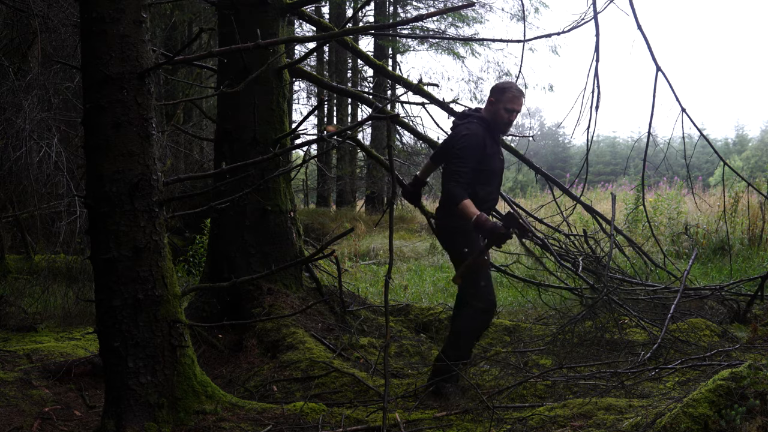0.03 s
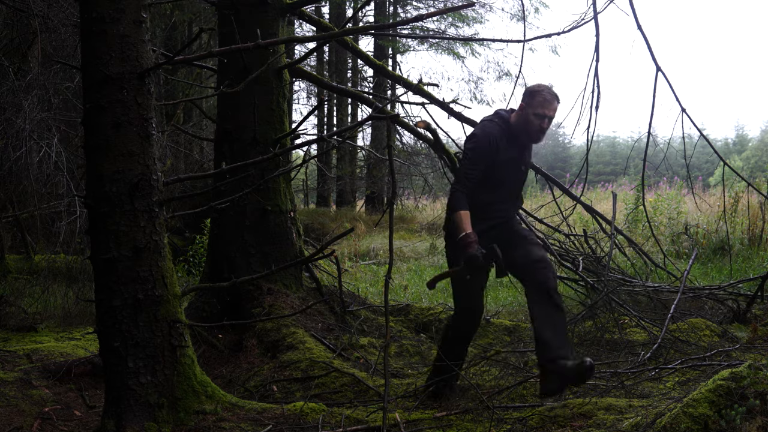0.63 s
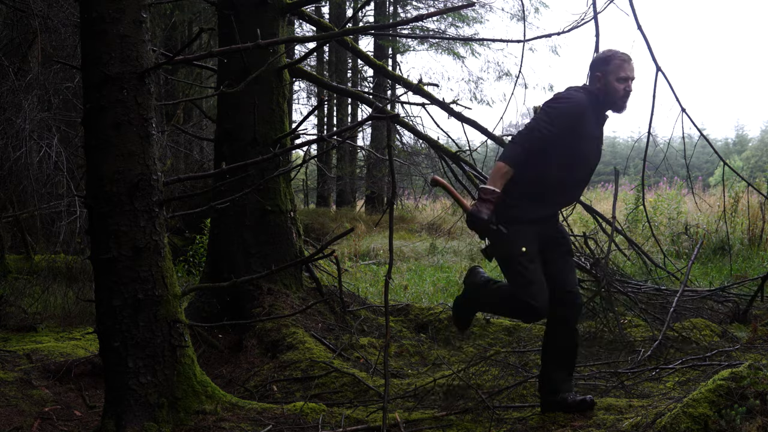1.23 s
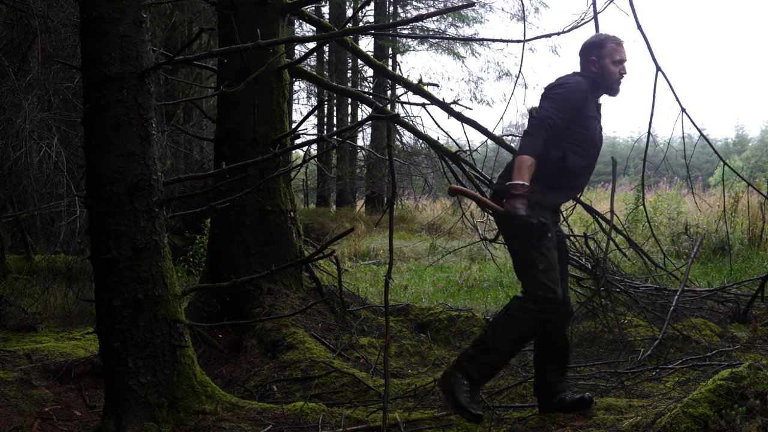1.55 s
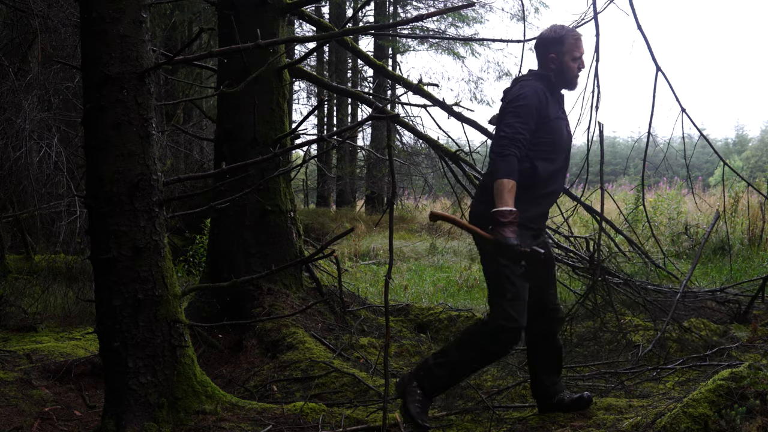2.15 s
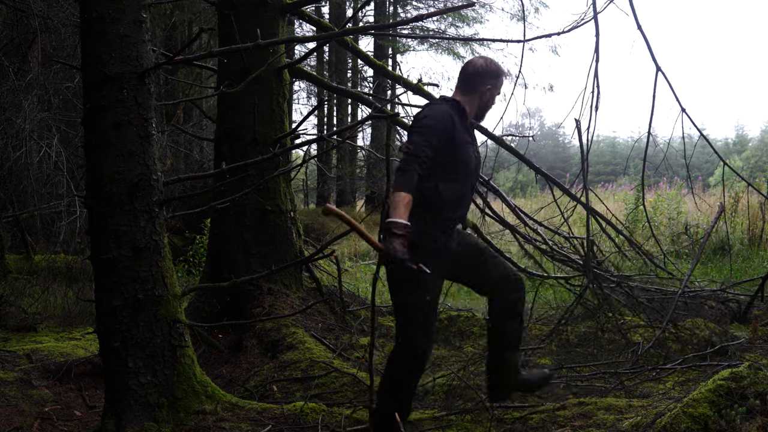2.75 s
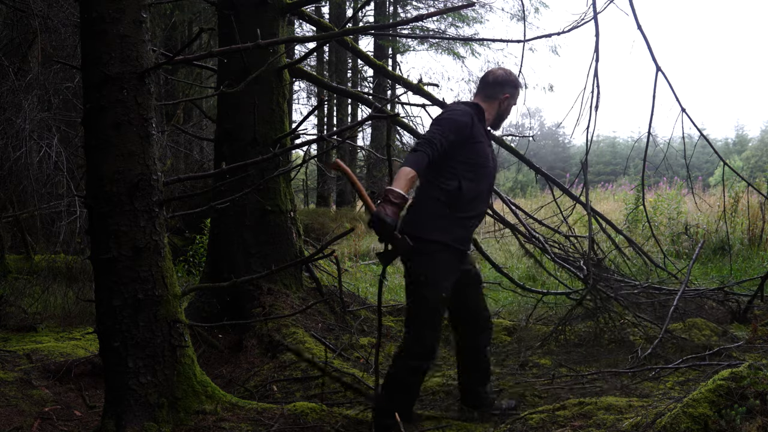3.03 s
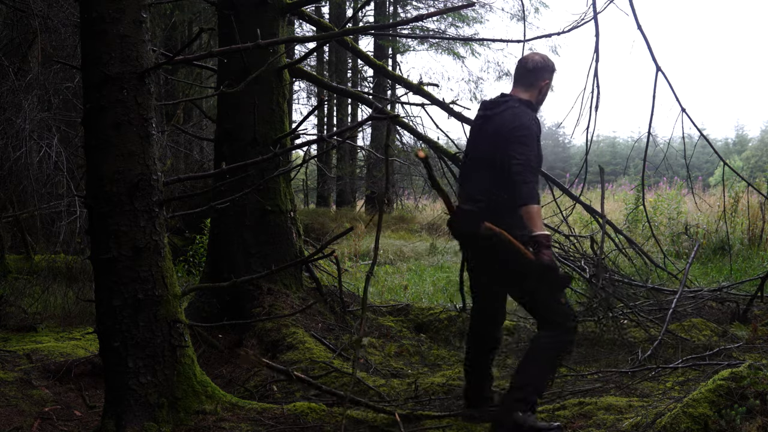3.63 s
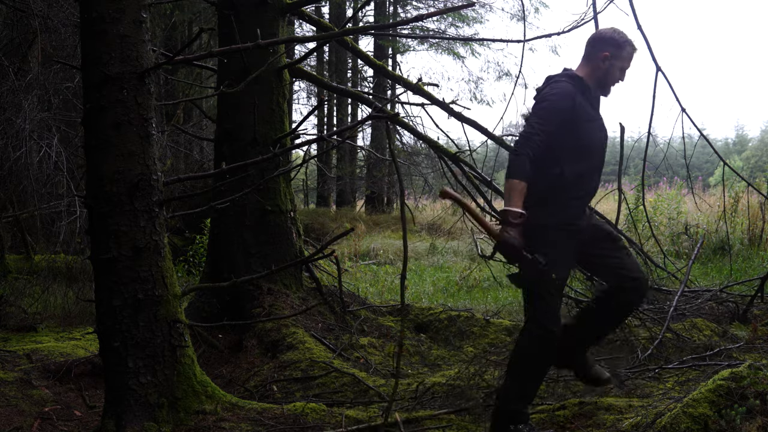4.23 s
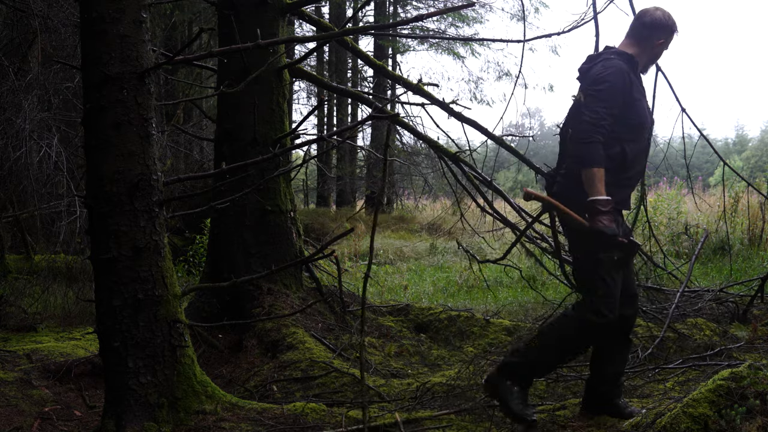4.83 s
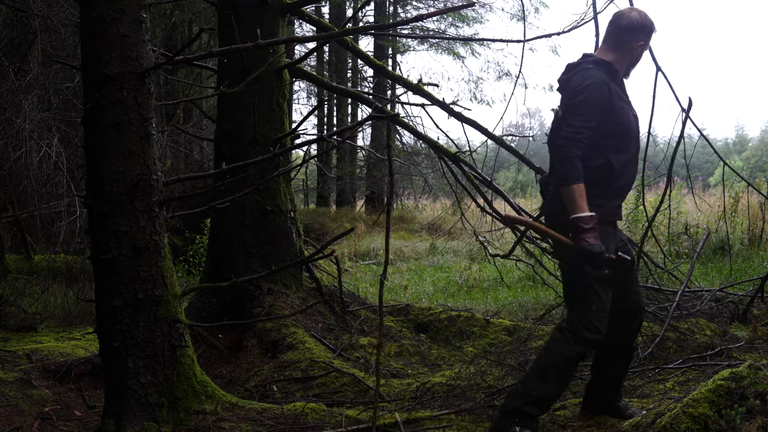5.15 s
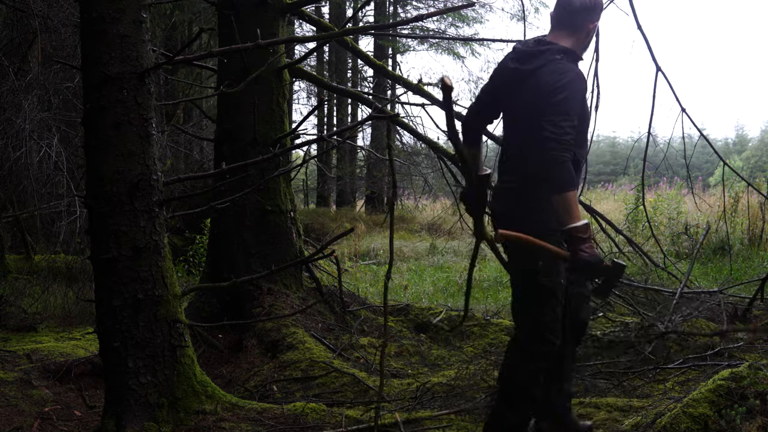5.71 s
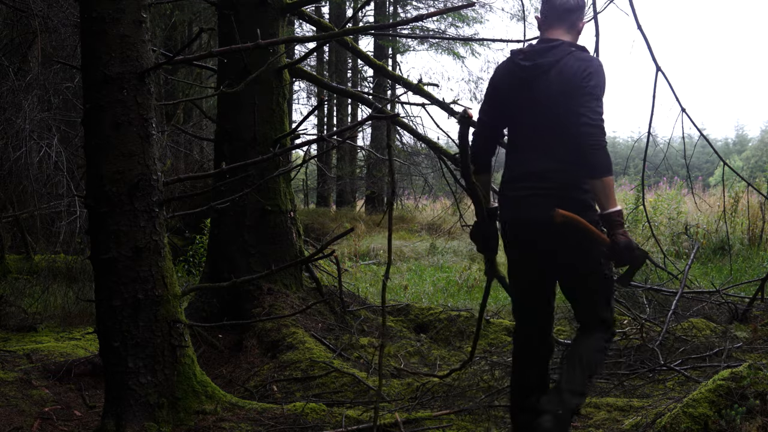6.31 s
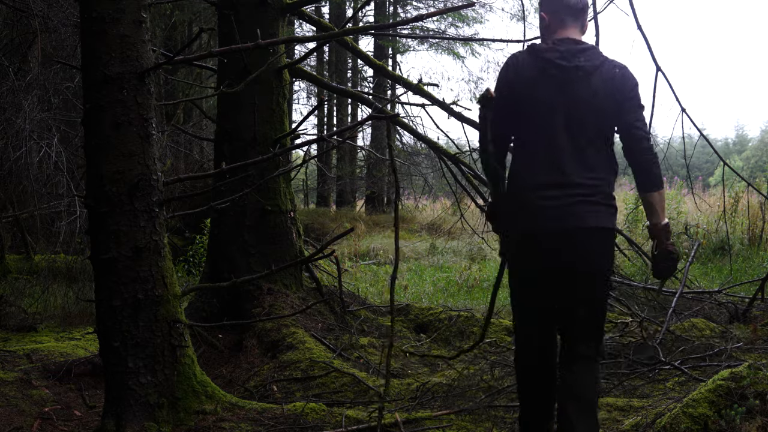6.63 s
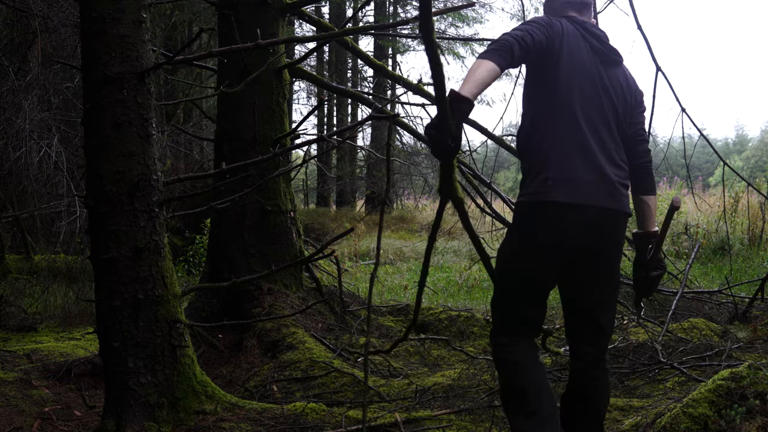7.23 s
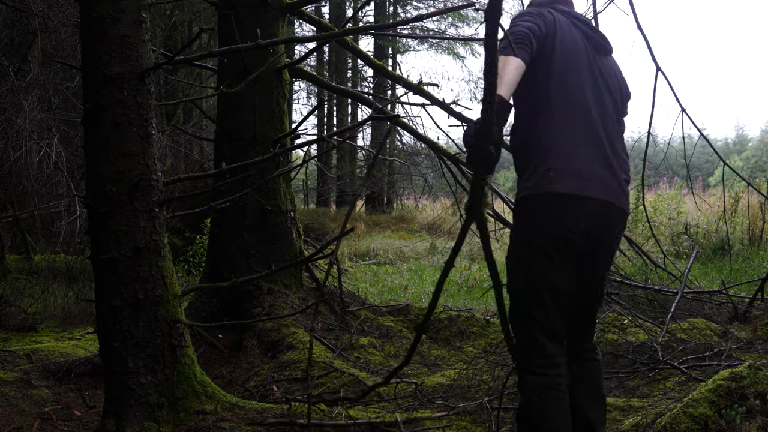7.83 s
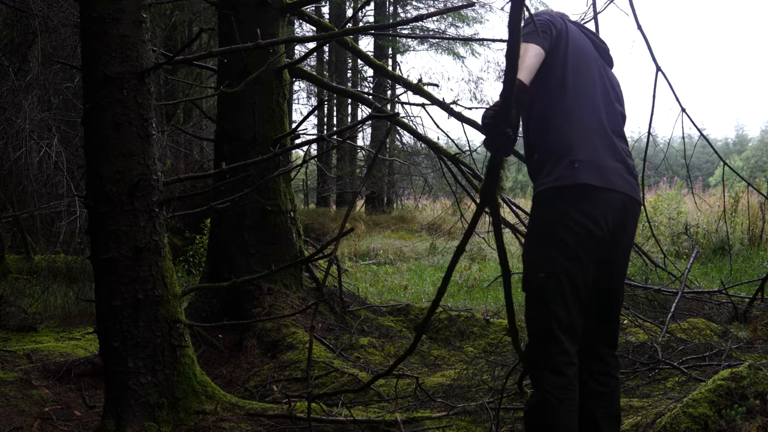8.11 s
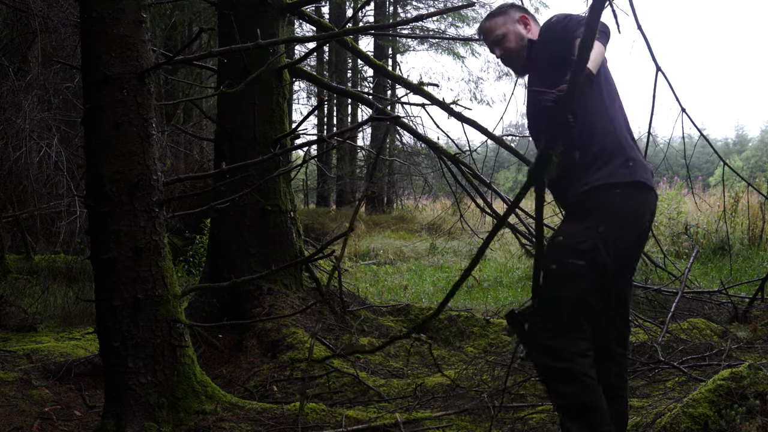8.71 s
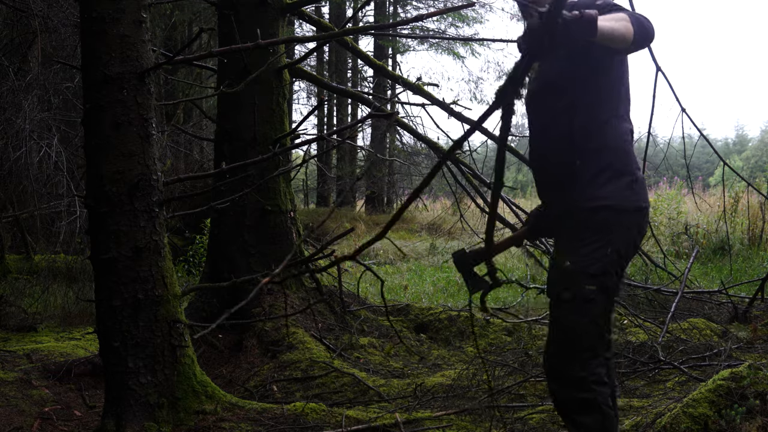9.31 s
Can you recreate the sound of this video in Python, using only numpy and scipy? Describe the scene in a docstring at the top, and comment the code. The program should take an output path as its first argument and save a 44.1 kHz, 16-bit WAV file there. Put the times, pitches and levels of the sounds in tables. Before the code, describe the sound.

Dry wood breaks in irregular bursts as someone treads through a quiet forest and drags a dead branch. A stick cracks with a hollow thud right at the start, and twigs crackle up to a loud, sharp snap at 1.3 seconds. More cracks and splintering snaps cluster from 2 to 3.2 seconds, followed by lighter ticks, woody raps and soft footfalls on moss. Each tug adds a light scrape and hiss of tangled twigs. The densest crackling runs from about 5.2 to 6 seconds, with loud, hollow cracks of thick sticks at 5.8 and 6.4 seconds. Sharp snaps follow near 6.8 and 7.3 seconds. Then it thins out, with a small ringing knock at 8.5 seconds, a crack near 9 and a last light snap. The wood is heard from straight ahead with barely any echo, over faintly murmuring air and a slight breeze on the microphone.

```python
"""Dead wood breaks as someone treads over a mossy forest floor, pulls a dry branch free and drags it.
Each brittle fracture sends out a pulse: thin twigs snap and splinter, thick sticks crack underfoot
and make the hollow ground thud, and wood held clear of the ground rings in its damped modes.
At each tug, friction makes the tangled twigs scrape and crackle until they settle.
The trunks scatter a faint echo, air murmurs in the trees and a breeze rumbles at the microphone."""
import sys
import numpy as np
from scipy import signal
from scipy.fft import rfft, irfft, next_fast_len
from scipy.io import wavfile
from scipy.ndimage import uniform_filter1d, map_coordinates

SR = 44100
rng = np.random.default_rng(int(sys.argv[2]) if len(sys.argv) > 2 else 0)


def pcm_store(signal):
    """Save signal as 16-bit PCM."""
    levels = np.round(np.clip(np.atleast_2d(signal), -1, 1) * 32767)
    wavfile.write(sys.argv[1], SR, levels.astype(np.int16).T)


N = 413216
HIT = np.arange(8192) / SR  # time within one hit, t/s

# Levels in all tables are relative; those of single hits refer to total energy.
# tugs on the branch: start t/s, duration/s, scrape level/dB, needle hiss level/dB
TUGS = [(.04, .1, -52, -60.5), (0.334, .17, -54, -60.5), (0.593, .02, -52, -57.5), (.77, .17, -55.5, -56.5),
        (1.026, .11, -48.5, -48), (1.264, .04, -49, -59.5), (2.214, .09, -57, -55), (2.56, .12, -51.5, -54),
        (2.99, .19, -49, -49), (3.613, .1, -56, -59), (3.853, .12, -56, -55.5), (4.145, .15, -54, -60.5),
        (4.38, .04, -55, -56.5), (4.872, .13, -56, -61), (5.324, .05, -48, -57), (5.398, .21, -46, -50.5),
        (5.629, .15, -43, -50.5), (5.879, .08, -51.5, -48), (6.591, .21, -53, -56), (6.801, .12, -50, -50),
        (6.971, .1, -58, -64.5), (7.08, 0.11, -50, -58), (7.185, .16, -47.5, -54.5),
        (7.432, .12, -55.5, -56.5), (7.559, 0.1, -48, -56), (7.823, .1, -58, -61.5), (8.971, .17, -58, -62)]
# thin twigs breaking: t/s, snap level/dB, pitch f/Hz, splinter level/dB
SNAPS = [(.1082, -15, 3020, -15.5), (.83, -25, 5200, -12), (0.845, -16, 8900, -30.5),
         (0.8688, -15.5, 6500, -21.5), (0.9054, -15, 7600, -13.5), (.967, -20, 6010, -13),
         (.998, -17, 6560, -23), (1.072, -1.5, 6700, -9), (1.0899, -14, 3500, -13.5),
         (1.1411, -13, 2850, -9), (1.2286, -16.5, 3280, -26.5), (1.242, -17, 4740, -23), (1.3, 7, 6500, 0),
         (1.807, -20, 5100, -22.5), (2.16, -20.5, 7000, -18), (2.2271, -14, 5200, -15.5),
         (2.23, -1.5, 5840, -15.5), (2.2306, -8, 5460, -11.5), (2.233, -0.5, 6400, -20.5),
         (2.2726, -7.5, 6600, -10), (2.2795, -8.5, 5260, -5.5), (2.427, -21, 4170, -14.5),
         (2.46, -19.5, 4500, -17.5), (2.5032, -9, 5400, -13.5), (2.608, -17, 5360, -15.5),
         (2.621, -25, 4300, -25), (2.6854, -15.5, 3030, -21.5), (2.77, -9, 4730, -10),
         (2.7792, -6, 4300, -4.5), (2.847, -15, 4300, -14), (3.0177, 2.5, 7030, -3.5),
         (3.0473, -16, 4140, -16), (3.064, -17, 4500, -19.5), (3.0989, -6.5, 7040, -20),
         (3.1531, -13, 4030, -19), (3.186, -22, 3000, -15), (3.2305, -19, 3550, -16),
         (3.95, -19.5, 5160, -19), (3.9788, -17, 4520, -23.5), (4.132, -16.5, 7330, -37),
         (4.2368, -18, 2850, -41), (4.2778, -19, 3780, -17.5), (4.5907, -20, 4830, -6.5),
         (4.8941, -18, 4860, -15.5), (4.947, -27, 8000, -22), (4.99, -17.5, 2450, -20),
         (5.097, -23, 2700, -30), (5.2426, -6.5, 6500, -10.5), (5.2455, -9.5, 8200, -13),
         (5.2543, -19, 7500, -29.5), (5.346, -21.5, 5000, -26), (5.3893, -5, 3940, 2),
         (5.442, -14, 8800, -16.5), (5.47, -17, 6160, -11), (5.475, -21, 4560, -15.5),
         (5.5084, -12, 5740, -14), (5.5279, -4.5, 6050, -21), (5.5325, 3, 6100, -10.5),
         (5.57, -15, 8000, -6), (5.808, -18.5, 4500, -26), (5.878, -10, 4400, -13.5),
         (5.879, 2, 5000, -3.5), (5.922, -8.5, 6450, -13.5), (5.954, -8.5, 5230, -11.5),
         (5.968, -9, 5030, -19.5), (6.5297, 0, 6300, -14), (6.609, -15, 7300, -41), (6.799, -15, 2800, -20),
         (6.8156, 3.5, 6600, -2), (6.8935, -11, 6640, -9.5), (6.9321, -13.5, 7800, -11.5),
         (7.224, -14, 6040, -13.5), (7.2828, -1, 4400, -4), (8.053, -29, 4400, -26.5),
         (8.1321, -16.5, 3800, -39), (8.382, -25, 3000, -26), (8.812, -26, 5000, -23.5),
         (9.0117, -14, 5700, -17.5), (9.3383, -10.5, 3700, -27)]
# spectrum of a twig's fracture: f/pitch, level/dB
SNAP_SPECTRUM = [(.03, -31), (.27, -14.5), (.46, 0), (1, 2), (1.6, -4), (2.4, -12), (4, -23.5)]
# modes of the hollow ground: f/Hz, level/dB, T60/s
GROUND_MODES = [(131, -3.5, 0.16), (204, -2.5, 0.079), (280, -7, 0.065), (148.8, -9, 0.31)]


def amp(db):
    """Amplitude ratio of a level in decibels."""
    return 10 ** (np.asarray(db) / 20)


def unit(x):
    """Normalisation to rms 1."""
    return x / np.sqrt(np.mean(x ** 2) + 1e-20)


def sized(x, db):
    """Normalisation to a total energy level."""
    return amp(db) * x / (np.linalg.norm(x) + 1e-20)


def along(points, hz):
    """Interpolation of (f/Hz, value) points on a logarithmic frequency axis."""
    f, v = np.transpose(points)
    return np.interp(np.log(hz + 1e-9), np.log(f), v)


def wobble(rate):
    """Slow random modulation: a spline through `rate` knots a second."""
    knots = rng.standard_normal(int(N * rate / SR) + 4)
    return map_coordinates(knots, [np.arange(N) * rate / SR])


def filtered(x, response):
    """Linear filtering: the spectrum of x times a frequency response."""
    m = next_fast_len(N + SR // 2)
    return irfft(rfft(x, m) * response(np.fft.rfftfreq(m, 1 / SR)), m)[..., :N]


def click(spectrum, pitch=1, ripple_db=0):
    """Minimum-phase pulse of a spectrum; random ripples give each piece of wood its own colour."""
    hz = np.fft.rfftfreq(len(HIT), 1 / SR)
    band = 9 * np.log1p(hz / 600)
    ripple = map_coordinates(rng.standard_normal(40), [band])
    cepstrum = irfft(np.log(amp(along(spectrum, hz / pitch) + ripple_db * ripple)))
    cepstrum[1:len(HIT) // 2] *= 2  # folding the cepstrum makes the pulse causal
    cepstrum[len(HIT) // 2:] = 0
    return sized(irfft(np.exp(rfft(cepstrum))), 0)


def ring(modes, pitch=1, detune=0.0043):
    """Free vibration: a sum of damped modes, struck a little differently each time."""
    return sum(amp(db + rng.normal(0, 1.8) - 60 * HIT / t60)
               * np.sin(2 * np.pi * pitch * hz * rng.normal(1, detune) * HIT) for hz, db, t60 in modes)


def shiver(pulse, t60, spiky):
    """Convolution with decaying noise: a dying cloud of uneven copies of a pulse."""
    sizes = rng.standard_normal(len(HIT)) * np.exp(spiky * rng.standard_normal(len(HIT)))
    envelope = amp(-60 * HIT / t60) * (1 - np.exp(-HIT / 0.00017))
    return signal.fftconvolve(sizes * envelope, pulse)[:len(HIT)]


def add(track, s, sound):
    """Superposition of a sound on a track, s seconds in."""
    start = max(0, round(s * SR))
    part = track[start:start + len(sound)]
    part += sound[:len(part)]


def forest_air():
    """Flow noise: a nearly steady murmur of air in the trees, partly coherent between left and right."""
    # spectrum of the murmur: f/Hz, level/dB
    murmur = [(20, -22), (45, -18), (85, -6.5), (130, 5), (180, 0.5), (320, -2), (600, -1.5), (900, -0.5),
              (1500, -9), (2100, -14), (3100, -16.5), (5000, -19), (10000, -22.5), (16000, -29.5)]
    # likeness of left and right: f/Hz, correlation
    correlation = [(25, .5), (70, 1), (150, 0.7), (1000, 0.85), (10000, 0.9)]

    def mid_and_side(hz):
        angle = np.arccos(np.clip(along(correlation, hz), -1, 1)) / 2
        return amp(along(murmur, hz)) * [np.cos(angle), np.sin(angle)]

    mid, side = filtered(rng.standard_normal((2, N)), mid_and_side)
    return amp(-53.5 + 0.2 * wobble(1.53)) * unit(np.array([mid + side, mid - side]))


def breeze():
    """Wind noise: pressure fluctuates independently at each microphone port, more at the right one."""
    # course of the rumble: t/s, level/dB
    gusts = [(0, -74), (.3, -65), (.65, -56.5), (1, -68), (1.55, -81), (1.8, -58), (2.5, -70), (3.7, -95),
             (5.2, -88), (5.7, -67), (6.3, -79), (7.7, -66), (8.4, -88)]
    spectrum = [(15, -8), (45, -1), (75, -2), (200, -11), (800, -90)]  # f/Hz, level/dB
    s, db = np.transpose(gusts)
    rumble = filtered(rng.standard_normal((2, N)), lambda hz: amp(along(spectrum, hz)))
    return amp(np.interp(np.arange(N) / SR, s, db) + [[-4], [1]]) * unit(rumble)


def rubbing(tug_levels_db, shake_db, stir_db):
    """Incoherent sources add in power: the envelope of tugs, shaking by snaps and a constant stir."""
    grip_s, settle_db_per_s, shake_db_per_s = 0.023, 110.5, 64.5
    t = np.arange(SR) / SR
    power = np.full(N, amp(stir_db) ** 2)
    for (s, length, *_), db in zip(TUGS, tug_levels_db):
        grip = np.minimum(t / grip_s, 1)
        add(power, s, (grip * amp(db - settle_db_per_s * np.maximum(t - length, 0))) ** 2)
    for s, *_, splinter_db in SNAPS:
        add(power, s, amp(splinter_db + shake_db - shake_db_per_s * t) ** 2)
    return np.sqrt(power)


def crackle(spectrum, slips_per_s, spread_db=6, smooth_db=-0.5, twig_count=10):
    """Stick-slip friction: tiny random slips of many twigs, each in its own colour, over a smooth rub."""
    slips = np.zeros(N)
    for _ in range(twig_count):
        slipping = rng.random(N) < slips_per_s / twig_count / SR
        sizes = rng.choice([-1, 1], N) * amp(spread_db * np.minimum(rng.exponential(size=N), 3))
        slips += signal.oaconvolve(slipping * sizes, click(spectrum, ripple_db=3.5))[:N]
    rub = filtered(rng.standard_normal(N), lambda hz: amp(along(spectrum, hz)))
    return unit(unit(slips) + amp(smooth_db) * unit(rub))


def crunchy(x, depth_db):
    """Modulation in time and frequency: short crunches, each in the band of the twigs that catch."""
    spectra = signal.stft(x, nperseg=256)[2]
    patches = uniform_filter1d(rng.standard_normal(spectra.shape), size=9, axis=0)
    patches = uniform_filter1d(patches, size=5, axis=1)
    return unit(signal.istft(spectra * amp(depth_db * unit(patches)), nperseg=256)[1][:N])


def tips(strength, breaks_per_s=10, candidates=200):
    """A random point process: fine tips break more often and harder where the rubbing is stronger."""
    out = np.zeros(N)
    share = np.cumsum(strength) / np.sum(strength)
    chances, scatter = rng.random((candidates, 2)), rng.standard_normal((candidates, 2))
    for (when, chance), (size, thinness) in zip(chances, scatter):
        tick = click(SNAP_SPECTRUM, 3800 * np.exp(0.45 * thinness), ripple_db=2.0)
        at = min(np.searchsorted(share, when), N - 1)
        if chance < breaks_per_s * N / SR / candidates:
            force = (strength[at] / strength.mean()) ** 0.42
            add(out, at / SR, sized(tick, -30.5 + 5.5 * size) * force)
    return out


def dragging():
    """Sliding friction: bark scrapes on bark while needles hiss and fine tips tick."""
    # spectrum of rubbing bark: f/Hz, level/dB
    bark_spectrum = [(40, -47), (130, 3.5), (300, -9), (700, 1), (1100, 3.5), (1800, -5.5), (3000, 1),
                     (4500, -11.5), (7000, -28), (16000, -17.5)]
    # spectrum of rubbing needles: f/Hz, level/dB
    needle_spectrum = [(1500, -24), (4000, -6.5), (6500, -5.5), (10000, -8), (12500, -18), (16000, -27)]
    _, _, scrape_db, hiss_db = np.transpose(TUGS)
    bark = rubbing(scrape_db, shake_db=-54, stir_db=-61)
    needles = rubbing(hiss_db, shake_db=-57, stir_db=-66)
    scrape = bark * amp(2.3 * wobble(40))
    scrape *= crunchy(crackle(bark_spectrum, slips_per_s=280), depth_db=3.5)
    hiss = needles * amp(2.1 * wobble(50))
    hiss *= crunchy(crackle(needle_spectrum, slips_per_s=130), depth_db=2.2)
    return scrape + hiss + tips(needles)


def sticks():
    """Fracture under load: a thick stick knocks, cracks, rattles and excites the modes of the ground."""
    # sticks giving way: t/s, knock level/dB, pitch f/Hz, crack level/dB, thud level/dB
    breaks = [(0.0407, -1, 1260, -4.5, -3.5), (0.123, -17, 1200, -21, -23), (0.31, -18.5, 1200, -24, -36),
              (0.3196, -4.5, 1070, -8, -17.5), (0.3515, -12.5, 1170, -9.5, -25),
              (.4371, -7.5, 1310, -20, -29.5), (0.731, -18, 1140, -18, -41), (1.12, -13.5, 970, -15.5, -32),
              (1.6279, -21, 1350, -20.5, -43), (1.9847, -7, 1080, -11.5, -21), (2.063, -4.5, 1250, -5, -5),
              (2.1645, -8, 1230, -12.5, -17.5), (2.2916, -8, 970, -11.5, -22),
              (2.5778, -15.5, 1000, -21, -22), (2.6692, -11, 1120, -11, -33), (3.314, -15, 810, -26, -16),
              (3.699, -7, 986, -10, -16), (4.213, -17, 1170, -20, -32), (4.41, -17, 1230, -28, -29),
              (5.1274, -21.5, 1450, -20, -25), (5.8025, -12, 1350, -19, -26),
              (5.8238, 9.5, 744, -2.5, -8.5), (6.4277, 7.2, 748, 6, -2), (6.942, -8.5, 1180, -33, -27),
              (7.203, -9.5, 1060, -14.5, -36), (7.222, -10, 1310, -26, -22),
              (7.2414, -13.5, 1240, -12.5, -37), (7.6327, -12.5, 1450, -21, -38.8),
              (7.909, -19.5, 960, -26, -27), (8.5402, -7.5, 1250, -32, -35), (8.948, -3, 1130, -11.5, -8.5),
              (9.2881, -15.5, 1370, -25, -30)]
    # spectrum of the low knock: f/pitch, level/dB
    knock_spectrum = [(.08, -34), (.18, -5.5), (.4, -2), (.85, 3.5), (1.4, 1), (2, -8), (2.8, -15),
                      (3.6, -36), (5, -54.5)]
    # spectrum of the crack: f/(crack pitch), level/dB
    crack_spectrum = [(.55, -19), (.87, 0.5), (1.15, -1), (1.55, -14), (2.1, -17), (3, -21.5), (5, -29)]
    # harder cracks tend to be higher: level/dB, crack pitch f/Hz
    crack_pitches = [(-12, 2200), (-16.5, 2780), (-5, 3120), (8.5, 4030)]
    out = np.zeros(N)
    for s, db, hz, crack_db, thud_db in breaks:
        crack_hz = np.interp(crack_db, *np.transpose(crack_pitches))
        crack = click(crack_spectrum, crack_hz, ripple_db=1)
        knock = click(knock_spectrum, hz, ripple_db=1)
        blow = sized(knock, db - .5) + sized(crack, crack_db - .5)
        # the wave returns inverted from the far end half a period later, which makes the knock hollow
        blow = blow - 0.18 * np.pad(blow, (round(SR / hz / 2), 0))[:len(blow)]
        # heavy sticks lie deep in the moss, which damps their rattle
        rattle = sized(shiver(blow, t60=0.044, spiky=0.21), .5 * db - 13.5)
        add(out, s, blow + rattle)
        add(out, s + 0.00286, sized(ring(GROUND_MODES, detune=0.068), thud_db))
    return out


def trunks(x, delay_s=0.0063):
    """Reverberation by scattering from the trees, each frequency dying at its own rate."""
    # reverberation times: f/Hz, T60/s
    decay_times = [(150, 0.82), (1000, 0.53), (4000, 0.19), (14000, 0.86)]
    hz, t, spectra = signal.stft(rng.standard_normal(SR // 2), SR, nperseg=256)
    decay = amp(-60 * t / along(decay_times, hz)[:, None])
    tail = signal.istft(spectra * decay, SR, nperseg=256)[1]
    delayed = np.pad(x, (round(delay_s * SR), 0))
    return signal.fftconvolve(delayed, sized(tail, 0))[:N]


def twigs():
    """Brittle fracture: a twig parts at once, its last fibres follow, the stub rings, splinters shiver."""
    # bending modes of the stub: f/pitch, level/dB, T60/s
    stub_modes = [(.53, 15, 0.013), (.9, -19, 0.0079)]
    # spectrum of the splinters: f/Hz, level/dB
    splinter_spectrum = [(60, -24), (300, -7), (700, 2.5), (1600, -2.5), (3000, 4), (5500, -2),
                         (9500, -1.5), (16000, -9.5)]
    # fixed tone colour of the snaps, a dip near 5.7 kHz, brighter above 8 kHz: f/Hz, level/dB
    snap_colour = [(1500, 0.5), (2600, .5), (4300, -0.5), (5700, -3), (8000, 2), (12000, 2)]
    out = np.zeros(N)
    for s, db, hz, splinter_db in SNAPS:
        snap = click(SNAP_SPECTRUM, hz, ripple_db=1.1)
        fibres = sized(shiver(snap, t60=0.0056, spiky=0.61), -2.5)
        # thicker, lower twigs ring more strongly
        stub = sized(ring(stub_modes, hz), -14 - 7 * np.log2(hz / 5000))
        splinters = shiver(click(splinter_spectrum, ripple_db=1.5), t60=0.095, spiky=0.97)
        add(out, s - .0002, sized(snap + fibres + stub, db + .5) + sized(splinters, splinter_db - 4.5))
        add(out, s + 0.0021, sized(ring(GROUND_MODES), db - 36))  # the freed end nudges the ground
    return filtered(out, lambda hz: amp(along(snap_colour, hz)))


def footfalls():
    """Soft impact: a sole or branch end spreads its force over time, so it thuds and scuffs the litter."""
    # boots and the branch end settling on moss: t/s, thud level/dB, scuff level/dB
    steps = [(1.131, -24, -11.5), (1.302, -30, -9), (3.018, -18, -12.5), (3.126, -17.5, -18),
             (3.658, -10.5, -34), (4.433, -13.5, -13), (5.949, -14.5, -25), (7.108, -32, -22),
             (7.276, -32, -10.5), (7.328, -35, -14.5), (7.628, -32, -9.5)]
    # spectrum of the thud: f/Hz, level/dB
    thud = [(60, -32), (135, 5), (260, -7.5), (1500, -38.5)]
    # spectrum of the scuff: f/Hz, level/dB
    scuff = [(100, -20), (450, -2), (1000, 5.5), (1900, -2.5), (3500, -12), (8000, -14), (16000, -34)]
    out = np.zeros(N)
    for s, thud_db, scuff_db in steps:
        add(out, s, sized(shiver(click(thud), t60=0.091, spiky=0.14), thud_db))
        add(out, s, sized(shiver(click(scuff, ripple_db=3), t60=0.12, spiky=0.79), scuff_db))
    return out


def ringing_wood():
    """Resonance: wood held clear of the ground rings for a moment; flicked twigs chatter as they ring."""
    # a bare stick rapped by its neighbours: t/s, level/dB
    raps = [(3.699, -13.5), (3.844, -12), (3.896, -19)]
    # modes of that stick: f/Hz, level/dB, T60/s
    stick_modes = [(1617, -0.5, 0.064), (2820, 1, 0.034), (3280, 3.5, 0.012), (3810, 1, .03),
                   (4320, -7, .025), (5950, -9, 0.031)]
    # the long branch bumped once: t/s, level/dB
    bumps = [(8.541, -5.5)]
    # modes of that branch: f/Hz, level/dB, T60/s
    branch_modes = [(690, 9, 0.06), (765, -2, .025), (876, 6, 0.051), (1090, -2, 0.038), (1360, 4, 0.015),
                    (2080, -10, 0.016)]
    # thin twigs flicked: t/s, level/dB, pitch f/Hz
    flicks = [(1.14, -9, 2680), (2.2253, -18, 2520), (2.77, -7.5, 2420), (2.78, -14, 2080),
              (3.047, -10.5, 3140), (3.536, -21.5, 3100), (3.764, -23.5, 1340), (4.2363, -15.5, 2650),
              (5.733, -13.5, 1920), (7.633, -11.5, 1770)]
    # modes of a flicked twig: f/pitch, level/dB, T60/s
    twig_modes = [(.9, -1, 0.016), (1.02, -0.5, 0.02), (1.85, -8, 0.015)]
    out = np.zeros(N)
    for hits, modes in ((raps, stick_modes), (bumps, branch_modes)):
        for s, db in hits:
            add(out, s, sized(ring(modes), db))
    for s, db, hz in flicks:
        tone = sized(ring(twig_modes, hz), 0)
        chatter = sized(shiver(tone, t60=.012, spiky=0.46), -6)
        add(out, s, sized(tone + chatter, db))
    return out


def microphone(x, low_hz, high_hz):
    """Band-pass response: the microphone sheds deep bass and the highest treble."""
    bass_cut = signal.butter(3, low_hz, "highpass", fs=SR, output="sos")
    treble_cut = signal.butter(3, high_hz, fs=SR, output="sos")
    return signal.sosfilt(np.vstack([bass_cut, treble_cut]), x)


def scene():
    """Superposition: the wood and its echo come from straight ahead, the moving air in stereo."""
    wood = twigs() + sticks() + footfalls() + ringing_wood() + dragging()
    wood = microphone(wood, low_hz=103, high_hz=12600)
    return wood + amp(-26.5) * trunks(wood) + forest_air() + breeze()


def record(dry, ceiling=0.95, top_hz=16000):
    """Soft saturation rounds off the highest peaks; a steep low-pass limits the band."""
    limited = dry / (1 + np.abs(dry / ceiling) ** 8) ** (1 / 8)
    return filtered(limited, lambda hz: 1 / np.sqrt(1 + (hz / top_hz) ** 120))


dry = scene()
out = record(dry)
pcm_store(out)
```